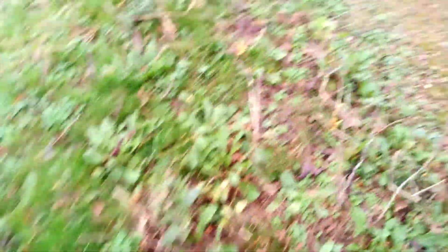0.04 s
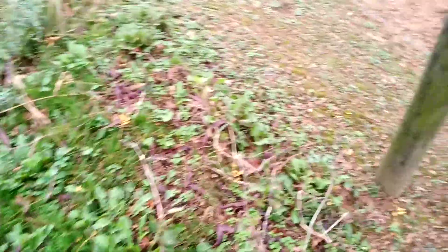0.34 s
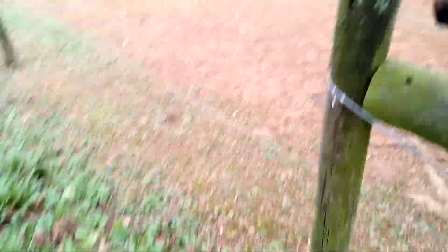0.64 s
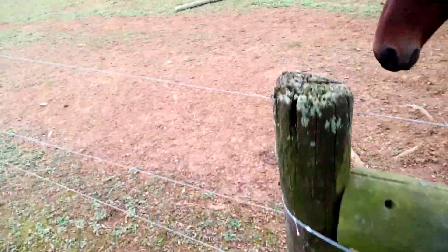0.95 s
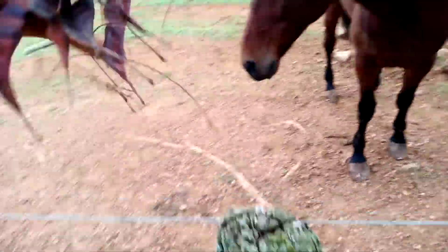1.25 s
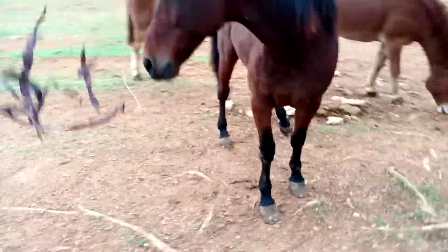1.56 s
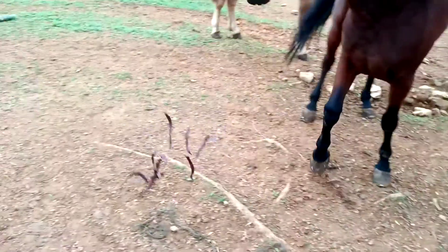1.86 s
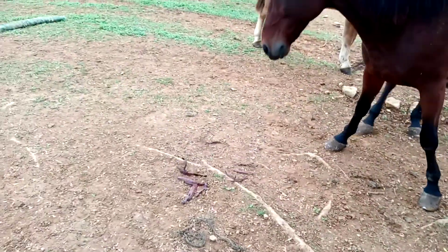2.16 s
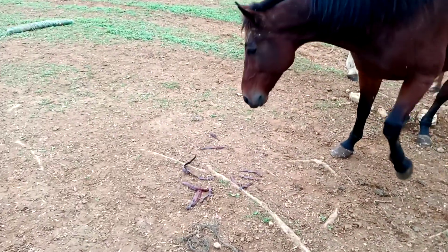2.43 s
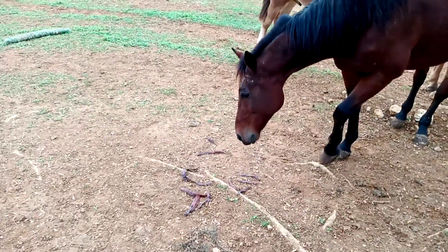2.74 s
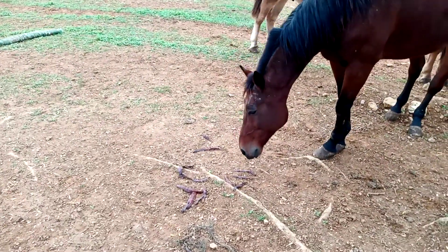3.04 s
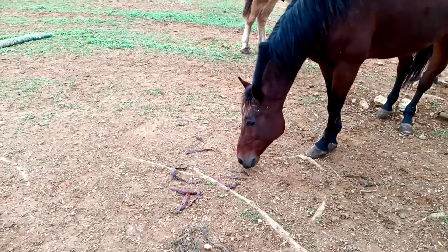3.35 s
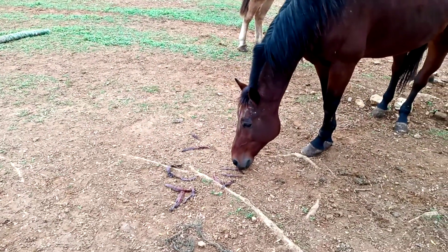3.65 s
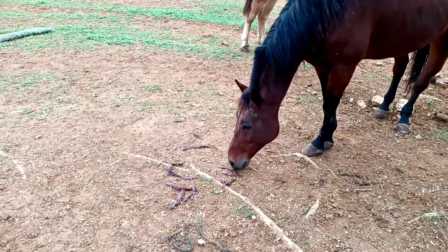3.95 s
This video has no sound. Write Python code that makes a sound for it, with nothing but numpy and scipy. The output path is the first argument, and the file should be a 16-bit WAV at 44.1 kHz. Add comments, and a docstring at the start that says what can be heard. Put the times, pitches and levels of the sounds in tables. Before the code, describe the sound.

Close crackling of dry plants and seed pods outdoors, as someone steps through and handles them. Tossed pods click on the ground, and it turns quieter: faint far chirps, a nudged stone and a soft hoof thud over low rumble.

```python
"""Leaves crackle and stalks snap as someone steps through low plants to a fence and gathers dry seed pods.
Tossed to a horse, the hollow pods clatter onto bare earth. Stems and ground scuff as things rub,
a nudged stone clacks, and feet, hands and hooves thud softly.
Small birds chirp far away near the end, and a low rumble wavers underneath a faint hiss of open air."""
import sys
import numpy as np
from scipy import signal
from scipy.fft import rfft, irfft
from scipy.io import wavfile
from scipy.ndimage import uniform_filter1d

SR = 44100
rng = np.random.default_rng(int(sys.argv[2]) if len(sys.argv) > 2 else 0)


def inscribe(sig):
    """Save sig as 16-bit PCM at rate SR to the path in sys.argv[1].

    A 1-D sig is mono; a 2-D sig holds one channel per row.
    Samples are clipped to [-1, 1] before scaling.
    """
    pcm = np.round(np.clip(np.atleast_2d(sig).T, -1, 1) * 32767)
    wavfile.write(sys.argv[1], SR, pcm.astype(np.int16))


N = 176400  # 4 seconds

# Stalks and pods snapping: (time [s], level [dB], ring pitch [Hz], woody body [dB], sharp edge [dB])
SNAPS = [(.1058, -39, 4900, -13, -12), (0.138, -44.5, 4500, 7, -5), (0.3422, -57, 7100, -17, 10),
         (0.4382, -29.5, 5660, -6, -32), (0.61, -20, 6680, -9.5, -4), (0.612, -36.5, 5630, 4, 11.5),
         (0.784, -35, 6250, 2, -19), (0.8586, -35, 6100, 4.5, -6), (0.9546, -24, 4550, 7, -29),
         (1.2305, -42, 5500, -10, -9), (1.1998, -33, 5440, -14, -5.5), (1.397, -32, 6000, -13, -6),
         (1.4545, -34, 3460, 5, -9), (1.8221, -33, 4830, -25, 0.5), (1.9423, -24, 4700, 4, -14),
         (1.946, -28, 4730, -8, -35), (1.9554, -24.5, 4320, -4, -12), (1.9853, -20, 4570, -21, -15),
         (2.039, -38.5, 3900, -21, -5), (2.0815, -34.5, 5300, -17, -6.5), (2.2493, -39, 4340, -19, -20),
         (2.3092, -42, 5640, -27, -5), (2.5521, -17.5, 6740, -46, -12), (2.552, -37.5, 4400, -30, -10)]
# Bursts of rustling: (start [s], hold [s], level [dB], woody body [dB], sharp edge [dB])
RUSTLES = [(0, 0.078, -64.5, -4, -6.5), (0.084, 0.047, -55.5, -6, -8.5), (0.15, 0.046, -61, -6, -11),
           (0.282, 0.087, -74.5, 4.5, 1), (0.424, 0.06, -56, -7.5, -2), (0.592, 0.014, -57.5, -2, -7),
           (0.624, 0.098, -63, -8, -16), (0.769, 0.1, -60, -6.5, -11), (0.897, 0.044, -57.5, -3.5, -5),
           (0.97, 0.023, -66, 6, -12), (1.161, 0.039, -57.5, -4, -9), (1.228, 0.093, -56, -7, -6.5),
           (1.357, 0.16, -55.5, -10.5, -7), (1.536, 0.078, -63, -4, -10), (1.652, 0.13, -63.5, -7.5, -10.5),
           (1.806, 0.11, -62.5, -8.5, -9), (1.93, 0.057, -46.5, -8.5, -6),
           (2.002, 0.096, -57.5, -7.5, -8.5), (2.129, 0.2, -68.5, -6, -10), (2.238, 0.032, -60, -12.5, -15),
           (2.457, 0.012, -60, -20, -13)]
# Tone of the crackling husks: (frequency [Hz], gain [dB])
HUSK_TONE = [(1000, -29.5), (2600, -8), (4000, 2), (5000, 4.5), (6600, 3.5), (9000, -16.5)]
# Tone of the woody body under the crackle: (frequency [Hz], gain [dB])
WOODY_TONE = [(700, -3), (1450, -4), (2050, 0), (3000, -0.5), (4000, 3)]
# Pods knocking on bare earth: (time [s], level [dB])
POD_LANDINGS = [(1.9405, -47), (1.9465, -49.5), (1.985, -56.5), (2.2494, -58.5), (2.5522, -54)]
# The notes a hollow pod rings with: (pitch [Hz], level [dB])
POD_NOTES = [(814, -3.5), (570, -10.5), (2620, -6), (3340, 2)]
# A stone nudged along the ground: (time [s], level [dB])
STONE_CLACKS = [(3.1963, -42), (3.2052, -48.5), (3.2131, -53), (3.2277, -50)]
# The notes the stone rings with: (pitch [Hz], level [dB])
STONE_NOTES = [(1990, -5), (2400, -4.5), (3320, -1), (3700, -5), (5290, -6.5)]
# Stems, pods and ground rubbing: (peak time [s], half-width [s], level [dB], centre pitch [Hz])
SCUFFS = [(.1, 0.098, -65.5, 490), (0.175, .014, -55, 385), (3.12, 0.047, -74.5, 664),
          (0.312, 0.0085, -49, 401), (0.469, 0.046, -65.5, 440), (0.556, 0.013, -63, 870),
          (.612, 0.0029, -40, 1510), (0.652, 0.037, -49.5, 444), (0.657, 0.034, -60, 1550),
          (0.955, 0.0035, -48.5, 423), (1.172, 0.025, -59.5, 680), (1.38, 0.4, -68.5, 3020),
          (1.522, 0.017, -51.5, 542), (1.521, .02, -69, 960), (1.764, 0.0092, -55.5, 401),
          (1.65, 0.5, -75, 490)]
# Soft thuds of feet, hands and hooves: (time [s], level [dB], pitch [Hz])
THUDS = [(0.3055, -36, 260), (0.443, -37, 138), (0.5576, -40, 168), (0.6276, -29.5, 216),
         (0.6745, -31, 326), (0.976, -36, 218), (3.587, -31.5, 120.5), (3.599, -38.5, 150)]
# Distant bird chirps: (time [s], level [dB], start pitch [Hz], end pitch [Hz])
CHIRPS = [(2.51, -72.5, 3220, 3470), (2.74, -77, 5300, 5170), (2.99, -71.5, 5250, 4970),
          (3.152, -67, 4650, 4860), (3.22, -75, 5360, 5060), (3.24, -68, 3110, 3770),
          (3.786, -71.5, 5040, 4580), (3.83, -69, 3650, 3330), (3.5, -74, 4210, 4130)]
# How the rumble swells and dips: (time [s], relative level [dB])
RUMBLE_SWELLS = [(0, -54), (1.6, -53.5), (2.2, -50.5), (3.05, -50), (3.262, -57.5), (3.362, -49),
                 (3.5, -59), (3.6, -46), (3.74, -57), (3.84, -48.5)]
# Tone of the low rumble: (frequency [Hz], gain [dB])
RUMBLE_TONE = [(22, -42.5), (55, -15), (70, -13), (81, 6), (95, -8), (125, -5.5), (160, -14.5), (270, -37),
               (1000, -70)]
# Tone of the open-air hiss: (frequency [Hz], gain [dB])
AIR_TONE = [(300, 3.5), (1000, -4), (2000, -7), (4500, -8), (6500, -12), (13000, -11), (16000, -15)]
# Tone of the microphone: (frequency [Hz], gain [dB])
MIC_TONE = [(20, 1), (6800, -2), (8100, -10.5), (11000, -13.5), (13700, -12.5), (14700, -3), (15500, -1),
            (16200, -14.5)]

STRIKE_RISE_S = 0.00019  # how quickly a struck or snapped thing starts to ring


def snaps():
    """Each snap rings the husk for a few cycles, with a woody crack and a sharp edge."""
    ring_fade_s, crack_fade_s, edge_fade_s = 0.00044, 0.00051, 0.0018
    out, t = np.zeros(N), np.arange(512) / SR
    rise = 1 - np.exp(-(t / STRIKE_RISE_S) ** 2)
    for start, db, hz, body_db, edge_db in SNAPS:
        body_noise, edge_noise = rng.choice([-1., 1.], (2, len(t)))
        phase = 2 * np.pi * hz * t
        notes = np.sin(phase) + amp(-12) * np.sin(0.697 * phase)  # main note and a softer, lower one
        ring = 2 * notes * rise * np.exp(-t / ring_fade_s)
        body = 0.91 * band(body_noise * np.exp(-t / crack_fade_s), (1780, 3700), "bandpass")
        edge = 1.05 * band(edge_noise * np.exp(-t / edge_fade_s), 4800, "highpass")
        add(out, start, amp(db) * (ring + amp(body_db) * body + amp(edge_db) * edge))
    return out


def rustle():
    """Leaves and pods crackle in bursts that rise, hold and fade, over a faint steady stirring."""
    rise_s, fade_s, stir_db, stir_end_s = 0.0082, 0.019, -79.5, 2.7
    t = np.arange(N) / SR
    husk = unit(colour(crackle(2070, 8510), HUSK_TONE))
    body = unit(colour(crackle(566, 4055, husks=12), WOODY_TONE))
    edge = unit(crackle(7500, 16000))
    out = amp(stir_db) * husk * np.clip((stir_end_s - t) * 10, 0, 1)
    for start, hold, db, body_db, edge_db in RUSTLES:
        rise = np.clip((t - start) / rise_s, 0, 1)
        fade = np.exp(-np.clip((t - start - hold) / fade_s, 0, 20))
        out += amp(db) * rise * fade * (husk + amp(body_db) * body + amp(edge_db) * edge)
    return out


def crackle(low_hz, high_hz, husks=24):
    """Tiny breaks ring many husks, each at its own pitch and each growing louder and softer at random."""
    ring_fade_s, drift_db, drifts_per_s = 0.0013, 3.0, 16
    out, drift_steps = np.zeros(N), np.arange(N) * drifts_per_s / SR
    decay = np.exp(-1 / (ring_fade_s * SR))
    for hz in np.linspace(low_hz, high_hz, husks) * rng.uniform(.98, 1.02, husks):
        drift = rng.standard_normal(int(drift_steps[-1]) + 3).clip(-2, 2)
        clicks = tiny_breaks(thin_by=husks)
        hits = np.flatnonzero(clicks)
        drift_at_hits = np.interp(drift_steps[hits] + rng.random(), np.arange(len(drift)), drift)
        clicks[hits] *= amp(drift_db * drift_at_hits)
        feedback = [1, -2 * decay * np.cos(2 * np.pi * hz / SR), decay * decay]  # makes each click ring
        out += signal.lfilter([1, 0, -1], feedback, clicks)
    return out


def tiny_breaks(thin_by=1):
    """Tiny breaks click at random, a few much louder than the rest; thin_by divides how many there are."""
    full_rate_per_s, spread_db = 5000, 5
    out, count = np.zeros(N), int(full_rate_per_s * N / SR / thin_by)
    where, chance, sign = rng.random((count, 3)).T
    size = np.minimum(-np.log(1 - chance), 3.26)  # mostly small, with a cap on the largest
    out[(where * N).astype(int)] = np.sign(sign - .5) * amp(spread_db * size)
    return out


def knocks(blows, notes, ring_s):
    """Each blow rings a pod's or stone's notes a little differently; they fall 60 dB in ring_s."""
    out, t = np.zeros(N), np.arange(SR // 10) / SR
    hz, note_db = np.transpose(notes)[:, :, None]
    rise = 1 - np.exp(-t / STRIKE_RISE_S)
    for start, db in blows:
        detune, sign = rng.uniform(-0.82, 1, (2, len(notes), 1))
        waves = np.sign(sign) * np.sin(2 * np.pi * hz * (1 + .03 * detune) * t)
        ring = waves * amp(note_db - 60 * t / ring_s)
        add(out, start, amp(db) * rise * ring.sum(0))
    return out


def scuffs():
    """Rubbing makes tiny clicks that swell and die away: narrow and hollow when low, broad when high."""
    out, t = np.zeros(N), np.arange(N) / SR
    hz = np.fft.rfftfreq(N, 1 / SR) + 1
    friction = rfft(tiny_breaks(thin_by=12) + amp(-15) * tiny_breaks())

    def resonance(centre_hz):
        """Lets through the pitches near centre_hz."""
        half_width_octaves = .00036 * centre_hz
        return 1 / (1 + (np.log2(hz / centre_hz) / half_width_octaves) ** 2)

    for peak_s, half_width_s, db, centre_hz in SCUFFS:
        tone = resonance(centre_hz) + amp(-19.5) * resonance(1.62 * centre_hz)
        swell = np.exp(-((t - peak_s) / half_width_s) ** 2)
        out += amp(db) * swell * unit(irfft(friction * tone, N))
    return out


def thuds():
    """Feet, hands and hooves make low knocks that die almost at once."""
    rise_s, fade_s = 0.0016, 0.0041
    out, t = np.zeros(N), np.arange(SR // 10) / SR
    shape = 2 * (1 - np.exp(-t / rise_s)) ** 2 * np.exp(-t / fade_s)
    for start, db, hz in THUDS:
        add(out, start, amp(db) * shape * np.sin(2 * np.pi * hz * t))
    return out


def birds():
    """Small birds whistle thin, mostly falling slides that linger among distant trees."""
    chirp_s, warble = .042, .02
    out, progress = np.zeros(N), np.linspace(0, 1, int(chirp_s * SR))
    for start, db, from_hz, to_hz in CHIRPS:
        waver = unit(uniform_filter1d(rng.standard_normal(SR // 4), 90))[:len(progress)]
        hz = (from_hz + (to_hz - from_hz) * progress) * (1 + warble * waver)
        whistle = np.sin(2 * np.pi * np.cumsum(hz) / SR)
        add(out, start, amp(db) * np.sin(np.pi * progress) * whistle)
    return out + amp(-2) * echo(out, ring_s=.42)


def rumble():
    """Deep noise wavers underneath, swelling and dipping most near the end."""
    lift_db, steadying = 0.5, 0.13
    low = unit(colour(rng.standard_normal(N + SR), RUMBLE_TONE, size=16384)[SR:])
    loudness = np.sqrt(abs(uniform_filter1d(low ** 2, size=3000)) + 1e-6)
    level = amp(lift_db + np.interp(np.arange(N) / SR, *np.transpose(RUMBLE_SWELLS)))
    return level * unit(low / loudness ** steadying)  # evens out the random swells a little


def open_air():
    """The open air is a faint, steady hiss."""
    return amp(-74) * unit(colour(rng.standard_normal(N), AIR_TONE))


def echo(x, ring_s):
    """Sound bounces off ground, fence and trees in a blur that falls 60 dB in ring_s."""
    t = np.arange(SR // 2) / SR
    tail = rng.standard_normal(len(t)) * amp(-60 * t / ring_s) * (t > .001)
    return signal.fftconvolve(x, tail / np.linalg.norm(tail))[:N]


def amp(db):
    """Turns decibels into a number to multiply by."""
    return 10 ** (np.asarray(db) / 20)


def unit(x):
    """Scales a sound to an average power of 1."""
    return x / np.sqrt(np.mean(x ** 2) + 1e-20)


def add(mix, start_s, sound):
    """Adds a sound to the mix at the given time."""
    part = mix[max(0, round(start_s * SR)):][:len(sound)]
    part += sound[:len(part)]


def colour(x, tone, size=2048):
    """Shapes a sound with a tone table, without smearing it earlier in time."""
    hz, db = np.transpose(tone)
    bin_hz = abs(np.fft.fftfreq(size, 1 / SR)) + 1
    log_gain = np.log(amp(np.interp(np.log(bin_hz), np.log(hz), db)))
    response = np.exp(np.conj(signal.hilbert(log_gain)))
    taps = np.fft.ifft(response).real[:size // 2]
    return signal.fftconvolve(x, taps)[:len(x)]


def band(x, hz, kind):
    """Keeps the pitches between two limits ("bandpass") or above one ("highpass")."""
    return signal.sosfilt(signal.butter(2, hz, kind, fs=SR, output="sos"), x)


def scene():
    """Mixes the close sounds and their two short echoes with thuds, birds and background, in mono."""
    near = snaps() + rustle() + scuffs()
    near += knocks(POD_LANDINGS, POD_NOTES, ring_s=.04)
    near += knocks(STONE_CLACKS, STONE_NOTES, ring_s=.014)
    echoes = amp(-13.5) * (echo(near, ring_s=.035) + echo(near, ring_s=.13))
    return (near + echoes + thuds() + birds() + rumble() + open_air())[None]


def record(dry):
    """The microphone softens the treble, and the very highest pitches are cut off."""
    top_hz = 16300
    low_pass = signal.firwin(255, top_hz, window=("kaiser", 8), fs=SR)
    return signal.fftconvolve(colour(dry[0], MIC_TONE), low_pass, "same")[None]


dry = scene()
out = record(dry)
inscribe(out)
```